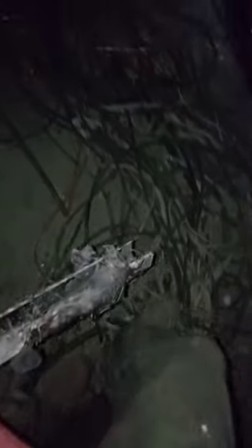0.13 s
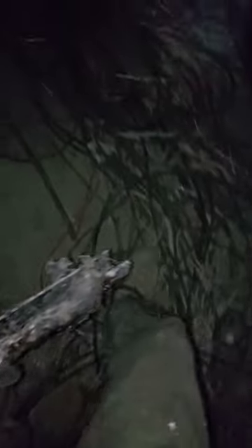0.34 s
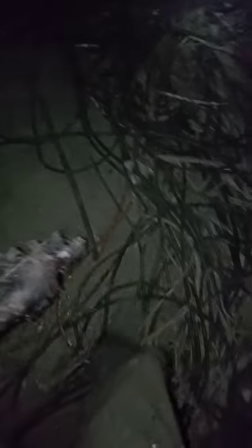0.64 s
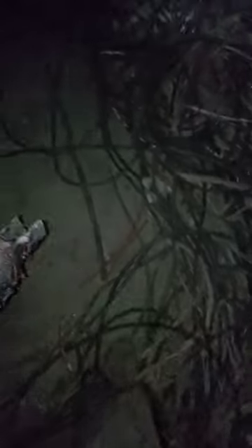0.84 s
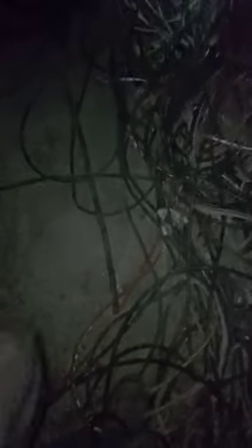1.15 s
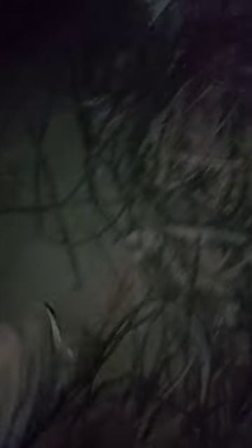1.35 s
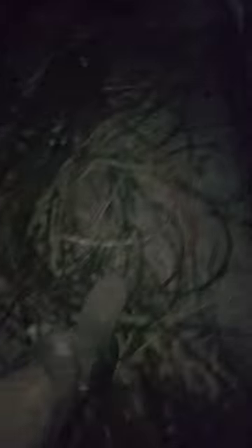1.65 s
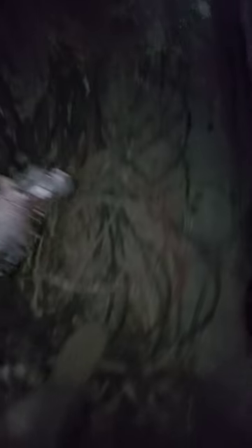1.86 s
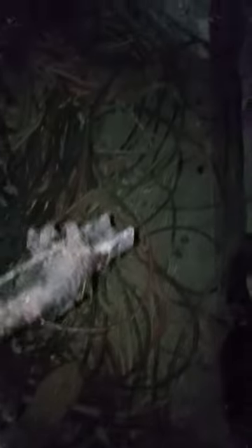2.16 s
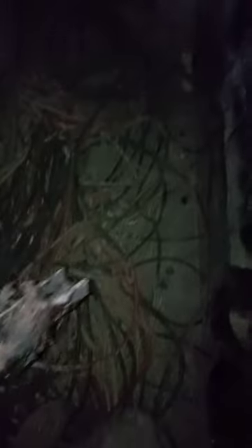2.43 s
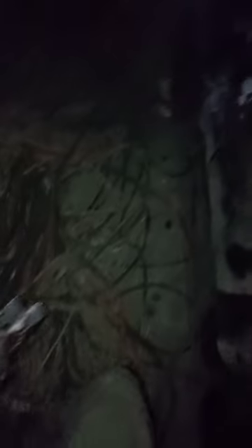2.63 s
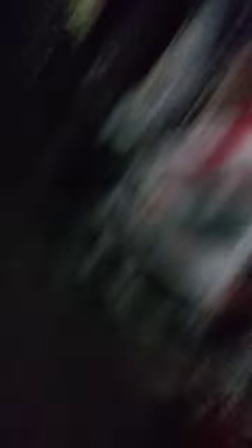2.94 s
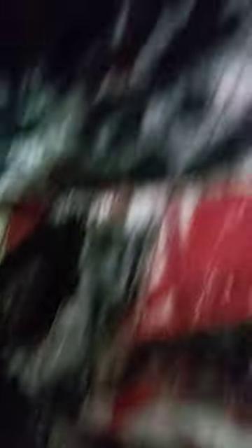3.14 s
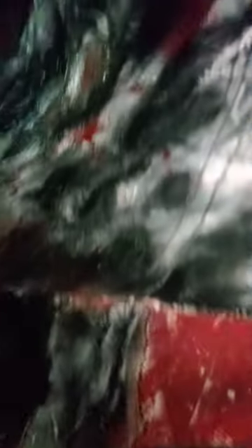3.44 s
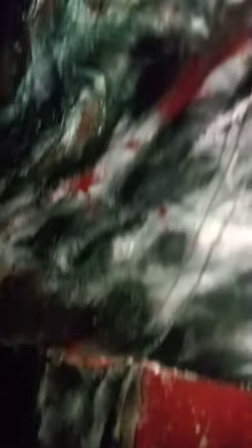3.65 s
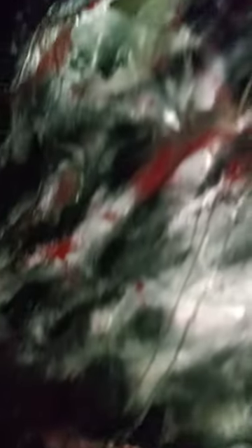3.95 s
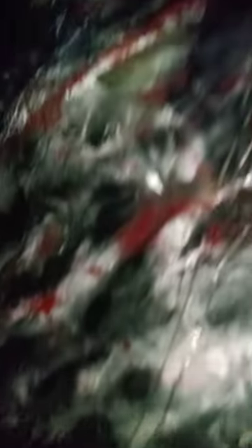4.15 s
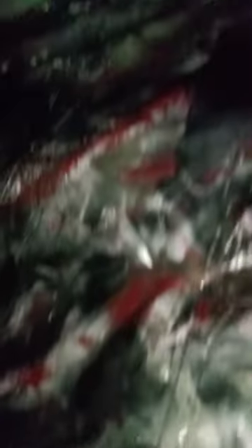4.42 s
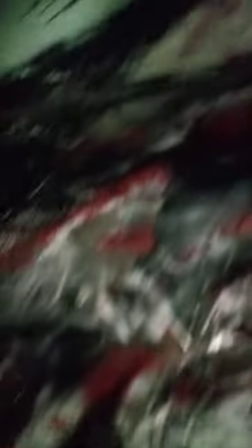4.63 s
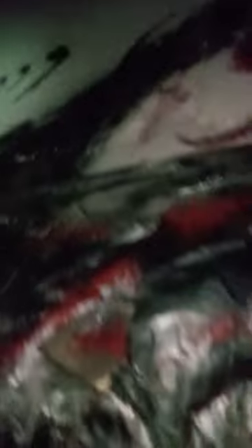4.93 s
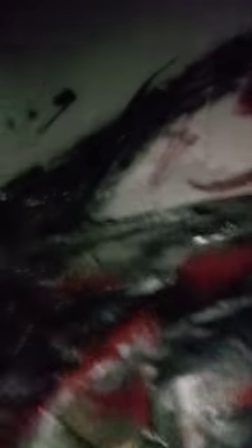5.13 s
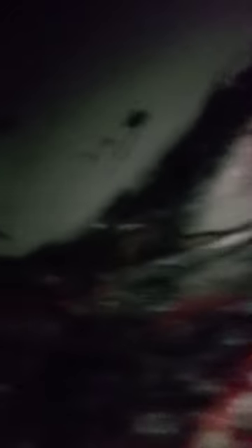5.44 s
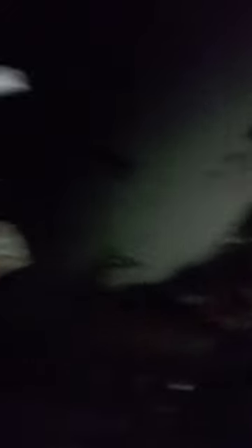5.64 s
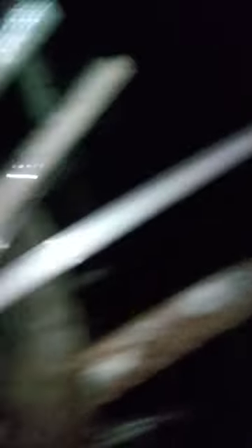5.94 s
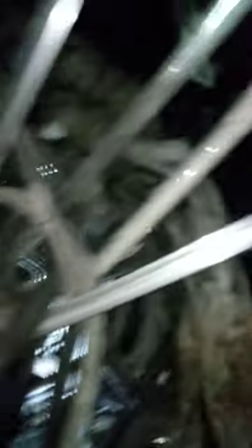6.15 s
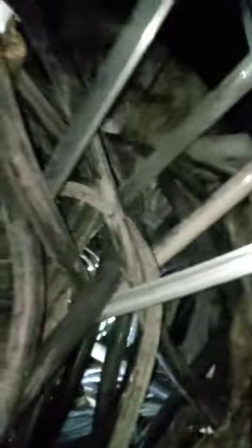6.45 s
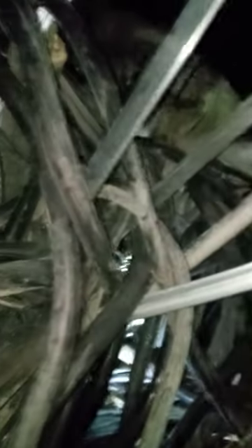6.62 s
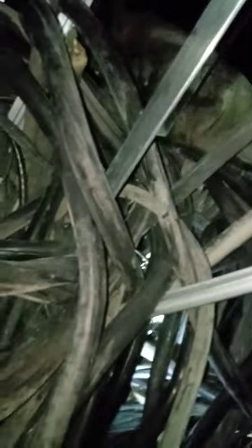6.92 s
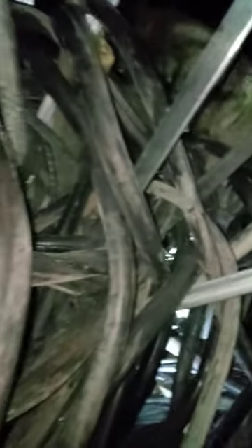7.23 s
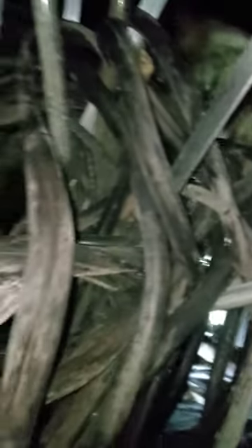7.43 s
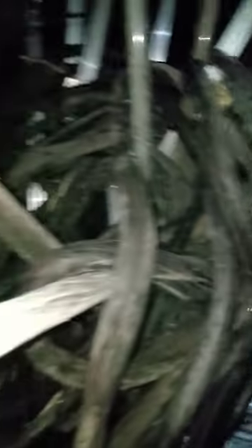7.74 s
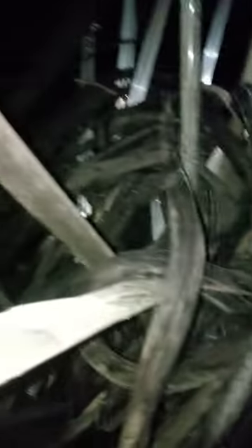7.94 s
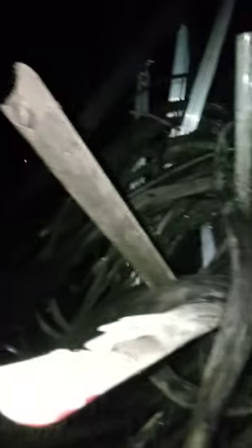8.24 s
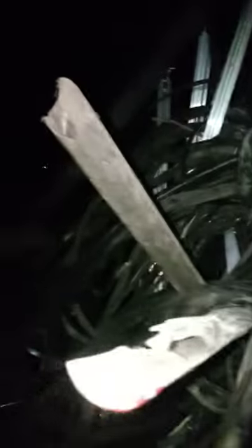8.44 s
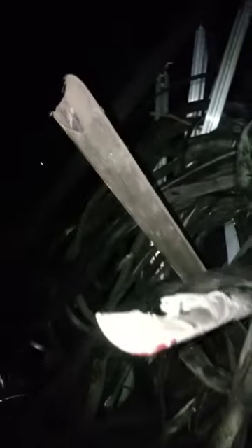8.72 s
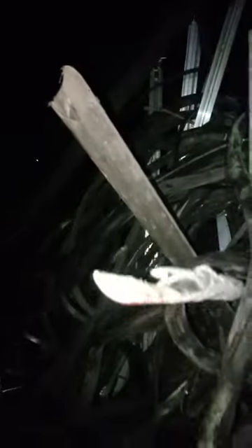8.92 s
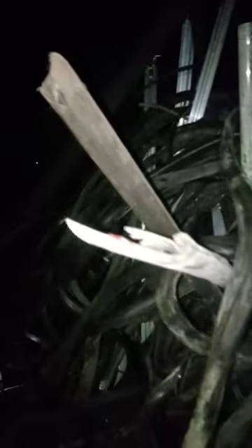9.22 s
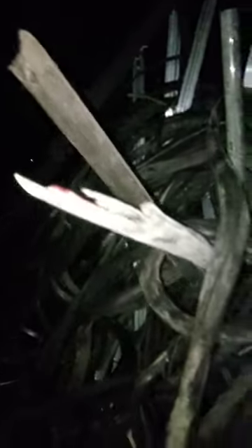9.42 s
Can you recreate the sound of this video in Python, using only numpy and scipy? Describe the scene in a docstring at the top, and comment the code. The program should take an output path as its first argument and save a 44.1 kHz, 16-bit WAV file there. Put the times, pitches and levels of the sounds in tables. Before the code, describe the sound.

Someone pushes through dry grass and dead stalks at night, with shoe scuffs, sharp snaps, and one thick hollow stalk breaking loudly.

```python
"""Walking through dry stalks

Someone pushes through dry grass and dead stalks at night, beside a hard wall.
Stalks crackle and snap, and one thick hollow stalk breaks: bursts of tiny fractures, filtered to ring.
Shoes scuff and thud in the same way; blades swish and rustle as grains of noise that swell and fade.
A long dull echo, made from the sound's stored energy, lies over a low outdoor rumble of filtered noise."""
import sys
import numpy as np
from scipy import signal
from scipy.fft import rfft, irfft, next_fast_len
from scipy.io import wavfile
from scipy.ndimage import uniform_filter1d, map_coordinates

SR = 44100
rng = np.random.default_rng(int(sys.argv[2]) if len(sys.argv) > 2 else 0)


def wav_out(sig):
    """Save sig, one row per channel (or a flat mono array), as 16-bit PCM at SR to the path in sys.argv[1]."""
    wavfile.write(sys.argv[1], SR, np.round(np.clip(np.atleast_2d(sig).T, -1, 1) * 32767).astype(np.int16))


N = 422478  # length of the scene in samples
HIT = np.arange(8192) / SR  # time axis of one short hit, in seconds
HIT_HZ = np.fft.rfftfreq(len(HIT), 1 / SR)

# Thin stalks snapping, from loud cracks to faint ticks that stand out in quiet moments.
# Each row: start in seconds, level in dB, ring in Hz, body in dB against the ring,
# splinters in dB against the ring (both before a small trim), tearing time in seconds.
THIN_SNAPS = [(0.0689, -36, 2030, -0.5, -18, 0.0094), (0.077, -35.5, 1700, -15, -15.5, 0.021),
              (0.765, -46.5, 1900, -18, -24, 0.048), (0.783, -38, 3950, -9, -24, 0.016),
              (1.2234, -57, 3400, -15, -7, .0074), (1.258, -33, 1770, -10.5, -31, 0.047),
              (1.6256, -38, 1740, -6, -13.5, 0.036), (1.6376, -33, 1740, -9, -17, 0.11),
              (1.693, -31.5, 1800, -26, -15, 0.037), (1.7058, -24, 1660, -25, -21, 0.0056),
              (1.7194, -23.5, 1950, -15, -16, 0.034), (1.7863, -37.5, 2350, -19, -3, 0.0095),
              (2.014, -27.5, 1380, -27, -43, 0.028), (2.118, -19, 2600, -13.5, -18.5, 0.0036),
              (2.125, -30.5, 1650, -17, -38, 0.028), (2.1456, -35.5, 2920, -22, -18, 0.0058),
              (2.576, -34, 3440, -9, -3, 0.029), (2.804, -44.5, 2420, -2.5, -6.5, 0.076),
              (3.0344, -38, 1760, -12, -14, .11), (3.1074, -45.5, 3160, -12, -7, 0.02),
              (3.1422, -47.5, 3120, -13, -25, 0.012), (3.2767, -45, 1520, -18, -34, 0.031),
              (3.452, -30, 2190, -24, -27, 0.039), (3.996, -48.5, 3000, 2, -11, 0.025),
              (4.007, -36.5, 2330, -5, -13, 0.071), (4.201, -62, 2490, -7, 9, .01),
              (4.232, -49.5, 2900, -7, -19, .041), (4.3118, -44.5, 2800, -7, -1.5, .022),
              (4.4334, -60, 2280, -6, 5, .036), (4.478, -59.5, 2780, -4, 0, 0.15),
              (4.5056, -52.5, 2780, -6, -5, 0.013), (4.531, -52.5, 2770, -4, 4, .027),
              (4.6379, -45.5, 2600, -13, -12, 0.018), (4.6727, -46.5, 2800, -11, -12, 0.023),
              (4.701, -46, 2600, -5, -11, 0.028), (4.7747, -19.5, 1890, -8.5, -18.5, 0.023),
              (4.8488, -41, 1280, -6, -12.5, .065), (4.9343, -49, 1740, -3, -10, .093),
              (5.018, -40.5, 3160, -15, -11, 0.016), (5.13, -34.5, 3100, -5, -12, 0.034),
              (5.1624, -32, 3100, -22, -16, 0.014), (5.52, -42, 1450, 2, -16, 0.092),
              (5.6233, -44.5, 1700, -3, -13, 0.1), (6.088, -39, 1260, -15, -1.5, 0.032),
              (6.1446, -40.5, 1300, -1, -4, 0.079), (6.3016, -41, 1340, -6, -21, 0.051),
              (6.485, -49.5, 1290, -2, -11, .031), (6.619, -55.5, 1540, 4, -7, 0.049),
              (7.0788, -54.5, 2680, -7, -6, 0.036), (7.1178, -53.5, 1320, -7, -5, .031),
              (7.2194, -46.5, 4270, -12, -5, 0.037), (7.237, -43, 2640, -13, -15, 0.032),
              (7.2477, -42, 3300, -10, -9, 0.035), (7.2933, -41, 2740, -21, -10, .019),
              (7.346, -53, 2490, -1, -4, 0.028), (7.6578, -45, 2200, -7, -6, 0.15),
              (7.7276, -56, 2550, -18, -4, 0.033), (7.813, -55, 3140, -4, -10, .016),
              (7.9885, -59, 1600, -7, 3.5, 0.046), (8.018, -48, 1770, -5, -5.5, 0.024),
              (8.106, -47.5, 3400, -13, -10.5, 0.028), (8.1478, -47, 2680, -9, -7, .13),
              (8.3114, -61.5, 2960, -3, 2, 0.052), (8.339, -57, 4200, -12, -8, .022),
              (8.385, -49, 2900, -4, -8, 0.1), (8.48, -53, 3250, -14, -12, .029),
              (8.525, -52, 2940, -6, -19, 0.021), (8.569, -44, 4660, -21, -10, 0.027),
              (8.609, -48, 3080, -9.5, -8, 0.033), (8.8067, -55.5, 3280, -10.5, -6.5, 0.034),
              (8.914, -47, 2000, -8, -17.5, 0.036), (9.065, -62, 2560, -9, -2.5, .039)]
# Tone of a thin stalk's woody body. Each row: frequency in Hz, relative level in dB.
BODY_TONE = [(100, -35.5), (380, -15), (620, 1.5), (950, 1.5), (1400, -4.5), (3000, -52), (9000, -86)]


def snaps():
    """Each thin stalk rings briefly at its own pitch, with a woody body and bright splinters."""
    out = np.zeros(N)
    for s, db, hz, body_db, splinter_db, t60 in THIN_SNAPS:
        run = tear(t60, first=1.47)
        ring = amp(-0.72) * stalk(run, hz)
        body = amp(body_db + 0.5) * blow(colour(run, BODY_TONE))
        splinters = amp(splinter_db + 1.2) * splinter(run)
        add(out, s, amp(db) * (ring + body + splinters))
    return out


# Broad tone of a dry stalk, before its rings. Each row: frequency in Hz, relative level in dB.
STALK_TONE = [(400, -13.5), (1000, -3), (1600, 3.5), (3100, 8), (4200, 1), (5500, -12.5), (9000, -49),
              (16000, -55)]


def stalk(run, hz):
    """A thin stalk's answer: a main ring, fading to both sides, and weaker rings that differ each time."""
    other_hz = hz * 2 ** rng.uniform(-.8, 1, 4)
    others = [(ring_hz, .12 * hz, 5) for ring_hz in other_hz]
    main = [(hz, 0.23 * hz, 9), (hz, 2.0 * hz, 10)]
    soft_top = (3.1 * hz, 2.1 * hz, -7)  # thicker stalks are duller
    return blow(colour(run, STALK_TONE, main + [soft_top] + others))


# Bright tone of splintering fibres. Each row: frequency in Hz, relative level in dB.
SPLINTER_TONE = [(1500, -17), (3500, 8), (5200, -1), (6300, -3), (7300, 3), (8600, -7.5), (10500, -13.5),
                 (12500, -14), (14200, -4), (16000, -14.5)]


def splinter(run):
    """The bright part of a fracture, with gentle chance resonances spread over the treble."""
    centres = np.linspace(4500, 14500, 6) + rng.uniform(-800, 800, 6)
    return blow(colour(run, SPLINTER_TONE, [(hz, 600, 5) for hz in centres]))


# The thick hollow stalk giving way. Each row: start in seconds, level in dB, thud in dB against
# the wood, splinters in dB against the wood (both before a trim), tearing time in seconds.
THICK_BREAKS = [(5.717, -40.5, -24.5, -20.5, 0.028), (5.878, -31.5, -13, -10.5, 0.085),
                (5.926, -38, -18, -16, 0.051), (5.966, -18.5, -15, -12, 0.022),
                (5.972, -11, -15, -33, 0.026), (6.015, -20.5, -40.5, -16.5, 0.042),
                (6.024, -21.5, -25, -20, 0.054), (6.039, -23.5, -7.5, -22, 0.049),
                (6.051, -32.5, -1, -40, 0.054)]
# Resonances of the hollow tube. Each row: frequency in Hz, width in Hz, strength in dB
# (widths and strengths are rescaled below).
TUBE_RINGS = [(614, 15.3, 8.5), (751, 32, 6), (1010, 40, -3.5), (1208, 10, -3), (1894, 18, -11),
              (1970, 76, -30), (2410, 17, -8.5), (2820, 43, -14), (3350, 55, -26), (7200, 180, -42.5)]
# Broad tone of the thick wood. Each row: frequency in Hz, relative level in dB.
WOOD_TONE = [(150, -58), (300, -11), (420, -12), (600, -7.5), (1100, -1.5), (1600, -11), (2600, -14.5),
             (4500, -24.5), (9000, -62.5), (16000, -63.5)]
# Tone of a jolt to the ground. Each row: frequency in Hz, relative level in dB.
THUD_TONE = [(20, -39), (50, -11), (100, 3), (170, 0.5), (260, -8.5), (420, -6.5), (1000, -52.5),
             (5000, -86.5)]


def breaks():
    """The thick stalk tears in stages, each ringing the same hollow tube and jolting the ground."""
    out = np.zeros(N)
    # broad rings of more even strength
    tube = [(hz, 2.3 * width, 8.5 + .25 * db) for hz, width, db in TUBE_RINGS]
    for s, db, thud_db, splinter_db, t60 in THICK_BREAKS:
        wood = amp(-1.0) * blow(colour(tear(t60, first=1.0), WOOD_TONE, tube))
        thud = amp(thud_db - 6.0) * blow(colour(tear(t60, first=0.49), THUD_TONE))
        crack = tear(0.58 * t60, first=0.56)  # the hard skin splits faster than the pith
        skin = amp(splinter_db + 5.5) * blow(colour(crack, STALK_TONE))
        bright = blow(colour(crack, SPLINTER_TONE, [(7140, 400, 7.1)]))
        splinters = amp(splinter_db + 2.0) * bright
        add(out, s, amp(db) * (wood + thud + skin + splinters))
    return out


# Shoes landing and scuffing. Each row: start in seconds, level in dB, knock in Hz, thud in dB
# against the knock, grit in dB against the knock (both before a trim), sounding time in seconds.
SHOE_STEPS = [(0.184, -30, 500, -35, -24, 0.078), (0.194, -28, 497, -30, -28, .1),
              (0.92, -32, 228, -11, -9, .047), (0.972, -32, 308, 7, 11, 0.12),
              (0.997, -25, 880, 3, -5, 0.062), (1.017, -24.5, 279, -5, -9, 0.039),
              (1.087, -29, 240, 0, -10.5, 0.12), (1.195, -32.5, 345, 4, -14, 0.069),
              (1.207, -26.5, 333, -15, -11.5, 0.012), (1.303, -27.5, 200, 6.5, -3, 0.031),
              (1.308, -15, 310, 4, -11, 0.0047), (1.316, -20, 860, -25, -3, 0.038),
              (1.325, -26.5, 222, 3, -1, 0.06)]
# Tone of crushed grit and straw. Each row: frequency in Hz, relative level in dB.
GRIT_TONE = [(300, -19), (900, 5.5), (1900, 13.5), (3200, 12), (5200, -2.5), (7300, -2.5), (10500, -22),
             (14500, -10)]


def steps():
    """A sole pushes on the ground, knocks, and crushes grit and straw."""
    out = np.zeros(N)
    for s, db, hz, thud_db, grit_db, t60 in SHOE_STEPS:
        push = tear(t60, first=4.6)
        knock_tone = [(hz / 4, -20), (hz, 0), (2.22 * hz, -10), (7 * hz, -38), (25 * hz, -75)]
        knock = amp(2.0) * blow(colour(push, knock_tone))
        thud = amp(thud_db - 7.5) * blow(colour(push, THUD_TONE))
        grit = amp(grit_db - 2.5) * blow(colour(tear(0.81 * t60, first=1.9), GRIT_TONE))
        add(out, s, amp(db) * (knock + thud + grit))
    return out


# Blades sweeping past a leg. Each row: peak in seconds, level in dB, seconds to rise by 60 dB,
# seconds to fall by 60 dB, ring in Hz, ring strength in dB.
BLADE_SWISHES = [(0.201, -36, 0.29, 0.31, 1935, 23), (0.68, -54.5, 0.19, 0.6, 11100, 25),
                 (0.893, -37.5, 0.066, .2, 1900, 15), (0.965, -25, 0.25, 0.13, 2880, -3),
                 (1.003, -20, 0.11, 0.071, 900, 0.5), (1.727, -34, 0.27, .45, 2200, 4),
                 (2.105, -35.5, .05, 0.18, 2580, 4.5), (2.43, -53, 0.41, .3, 2740, 13),
                 (3.448, -46, 0.13, 0.088, 2310, 31), (3.59, -48, .3, .27, 1480, 19),
                 (3.801, -45, .17, 0.14, 3480, -1), (4.019, -49.5, .054, 0.84, 2000, 8),
                 (5.87, -45.5, 0.69, 1, 3600, 12)]
# Broad tone of sliding blades. Each row: frequency in Hz, relative level in dB.
BLADE_TONE = [(30, -34), (120, -1), (900, 2), (1400, -3), (2800, -4), (4000, -11), (5300, -19), (7300, -14),
              (10500, -35), (12500, -35), (14500, -28), (16000, -36)]


def swishes():
    """Blades brush along the leg, swelling and fading; each tuft has its own pitch."""
    out = np.zeros(N)
    t = np.arange(-SR // 5, 2 * SR // 5) / SR  # seconds around the peak
    stutter = amp(2.8 * wobble(350))
    for s, db, rise, fall, hz, ring_db in BLADE_SWISHES:
        force = amp(db - 60 * np.maximum(-t / rise, t / fall))
        grains = fibres(len(t), rate=11000, spread_db=4.0)
        grains = grains * stutter[round(s * SR):][:len(t)]
        add(out, s + t[0], force * unit(colour(grains, BLADE_TONE, [(hz, 1.4 * hz, ring_db)])))
    return out


# Pushes through the grass. Each row: peak in seconds, rustle in dB, crackle in dB (both before
# a trim), seconds to rise by 60 dB, seconds to fall by 60 dB.
GRASS_PUSHES = [(0.05, -51, -64, .8, 1.5), (0.331, -48, -70.5, 1.2, 1.4), (1.13, -46, -69, 1, 1.2),
                (1.41, -44.5, -65, 0.62, 1.1), (1.981, -51, -63.5, .7, .6), (2.6, -57, -65, .4, .9),
                (3.101, -51, -68, .7, 1.1), (4.22, -53.5, -71, .5, .6), (4.501, -54, -68.5, 0.54, .5),
                (4.7, -55, -64, .5, .7), (4.95, -47.5, -66.5, 0.83, 2.5), (5.399, -50, -72, 0.56, .7),
                (5.85, -57, -55, .7, 1), (6.5, -59.5, -80.5, .8, .8), (7.261, -55, -60, .4, .8),
                (7.732, -55, -74, .3, .9), (8.36, -69, -77, .5, .6), (8.63, -66, -75.5, .5, .7),
                (9.02, -66, -82.5, .5, .6)]
# Light contact with the grass, dying down as the walker comes to rest.
# Each row: time in seconds, rustle in dB before a trim.
LIGHT_CONTACT = [(0, -57), (0.65, -62), (1.8, -55), (2.4, -58.5), (3.4, -57), (4.4, -63), (5.5, -57),
                 (6.9, -65.5), (8.5, -64), (9.58, -70)]
CONTACT_CRACKLE_DB = -23.5  # crackle gain of light contact against its rustle gain


def pressure():
    """Gains of the rustle and the crackle: every push swells and fades on top of the light contact."""
    rustle = amp(curves(LIGHT_CONTACT)[0]) ** 2
    crackle = rustle * amp(CONTACT_CRACKLE_DB) ** 2
    for s, rustle_db, crackle_db, rise, fall in GRASS_PUSHES:
        power = swell(s, rise, fall) ** 2
        rustle = rustle + amp(rustle_db) ** 2 * power
        crackle = crackle + amp(crackle_db) ** 2 * power
    return np.sqrt(rustle), np.sqrt(crackle)


TICK_DB, TICK_SPREAD_DB = -66.5, 9  # a weak tick under average brushing; the strongest above the weakest
TICK_FOLLOWS, TICK_CROWDING = .5, .35  # power of the crackle that sets the ticks' size, and their rate


def ticks(crackle_gain):
    """Bent blades give many small snaps, louder and closer together the harder they are brushed."""
    out = np.zeros(N)
    force = crackle_gain / np.exp(np.mean(np.log(crackle_gain)))  # 1 at average brushing
    due = np.cumsum(force ** TICK_CROWDING)
    draws = rng.random((220, 5))  # one row per tick
    for k, (when, size, pitch, bright, life) in enumerate(draws):
        at = min(np.searchsorted(due, due[-1] * (k + when) / len(draws)), N - 1)
        run = tear(.008 + .03 * life, first=1.5)
        tick = stalk(run, 2100 * 2 ** pitch) + amp(-11 + 12 * bright) * splinter(run)
        gain = amp(TICK_DB + TICK_SPREAD_DB * size ** 2) * force[at] ** TICK_FOLLOWS
        add(out, at / SR, gain * tick)
    return out


# Tone of rubbing dry blades. Each row: frequency in Hz, relative level in dB.
RUSTLE_TONE = [(400, -15), (1000, 1.5), (1800, 3), (3000, -1), (4200, -9.5), (5500, -26.5), (7300, -17),
               (10000, -40), (16000, -49.5)]
# Tone of litter under the soles. Each row: frequency in Hz, relative level in dB.
LITTER_TONE = [(150, -22.5), (450, -2), (900, -9.5), (1500, -12.5), (3000, -15), (9000, -62.5)]
# Soles dragging through the litter. Each row: peak in seconds, level in dB before a trim,
# seconds to rise by 60 dB, seconds to fall by 60 dB.
SOLE_DRAGS = [(0.02, -38.5, 0.66, 2.6), (0.27, -45, 0.75, 0.84), (0.8, -44, 0.22, 1.2),
              (1.22, -51, 0.74, 1.1), (2.079, -45, 0.54, 0.5), (2.6, -50.5, .8, 1.3)]


def brushing(rustle_gain, crackle_gain):
    """Dry blades rub and crackle in small clumps; soles drag through the litter."""
    clumps = amp(2.2 * wobble(45) + 3.5 * wobble(200))
    grains = fibres(N, rate=2600, spread_db=2.5) * clumps
    crackle = crackle_gain * amp(5.5) * unit(colour(grains, SPLINTER_TONE))
    rubbing = hiss(RUSTLE_TONE) + 1.03 * unit(colour(grains, RUSTLE_TONE))
    rustle = rustle_gain * amp(-5.0) * rubbing
    drag = sum(amp(db - 3.0) * swell(s, rise, fall) for s, db, rise, fall in SOLE_DRAGS)
    return crackle + rustle + drag * hiss(LITTER_TONE)


# How much sound is sent into the echo; sounds close by are drier.
# Each row: time in seconds, send level in dB.
ECHO_SEND = [(0, -18), (1.0, -66), (1.7, -8), (2.15, -29.5), (3.4, -10), (4.8, -6.5), (6.0, -11.5),
             (9.5, -4.5)]
# How long the slow part of the echo lasts. Each row: frequency in Hz, seconds to fall by 60 dB.
WALL_DECAY = [(100, 1.5), (400, 18), (800, 5.9), (2000, 2.46), (3500, 2.2), (6000, 1.1), (12000, .3)]


def walls(x):
    """A diffuse echo: each band stores the sound's energy and lets it go, quickly nearby and slowly far off."""
    hz, t, z = signal.stft(x * amp(curves(ECHO_SEND)[0]), SR, nperseg=256)
    energy = uniform_filter1d(np.abs(z) ** 2, size=5, axis=0)
    energy = uniform_filter1d(energy, size=3, axis=0)
    keep = amp(-120 * t[1] / along(WALL_DECAY, hz))  # share of the energy left after one step

    def store(shares):
        """Fill each band's energy store and let it leak."""
        bands = zip(shares, energy)
        return np.array([signal.lfilter([0, 1 - k], [1, -k], band) for k, band in bands])

    stored = 0.22 * store(keep) + 0.37 * store(keep ** 3)  # slow part, then one three times as fast
    tone_db = [(100, -15.5), (400, -0.5), (800, 3.5), (1300, -0.5),
               (2000, -1.5), (3200, -2), (5000, 0.5), (12000, -4.5)]
    tone = amp(along(tone_db, hz))[:, None]
    scatter = signal.stft(rng.standard_normal(N), nperseg=256)[2]
    echo = scatter / np.std(scatter) * tone * np.sqrt(np.abs(stored))
    return signal.istft(echo, nperseg=256)[1][:N]


# Loudness of the rumble over time. Each row: time in seconds, level in dB before a trim.
RUMBLE_LEVEL = [(0.0, -45.5), (0.21, -42), (0.64, -50), (1.17, -47), (1.41, -48), (2.94, -46.5),
                (3.66, -50), (6.86, -52), (9.58, -55.5)]
# Tone of the rumble. Each row: frequency in Hz, relative level in dB.
OUTDOOR_TONE = [(20, -31), (40, -11), (80, -1), (140, 1), (300, 1.5), (480, -6), (750, -13.5), (1200, -33),
                (3000, -27), (6000, -46.5), (15000, -54)]


def outdoors():
    """A low, lumpy rumble whose bands waver on their own."""
    level_db, = curves(RUMBLE_LEVEL)
    z = signal.stft(hiss(OUTDOOR_TONE), nperseg=4096)[2]
    patches = uniform_filter1d(rng.standard_normal(z.shape), 4, axis=0)
    patches = unit(uniform_filter1d(patches, 3, axis=1))
    rumble = signal.istft(z * amp(2.55 * patches), nperseg=4096)[1][:N]
    return amp(level_db + 2.0) * unit(rumble)


def fibres(count, rate, spread_db):
    """Tiny fractures of uneven size at random moments, rate a second."""
    breaking = rng.random(count) < rate / SR
    sign = rng.choice([-1, 1], count)
    return breaking * sign * amp(spread_db * rng.standard_normal(count))


def tear(t60, first):
    """One fracture, then a run of fibres that swells and dies; a slower tear has a weaker first fracture."""
    age = HIT / max(t60, .004)
    run = fibres(len(HIT), rate=9000, spread_db=0.5) * amp(-60 * age) * (1 - np.exp(-age / 0.06))
    run /= np.linalg.norm(run) + 1e-12
    run[0] += first * np.exp(-max(t60, 0) / 0.033)
    return run


def swell(s, rise, fall):
    """Gain over the whole scene: up 60 dB in rise seconds to a peak at s, down 60 dB in fall seconds."""
    t = np.arange(N) / SR - s
    return amp(-60 * np.minimum(np.maximum(-t / rise, t / fall), 2))  # never below -120 dB


def wobble(rate):
    """A smooth random curve, rate knots a second."""
    knots = rng.standard_normal(int(N * rate / SR) + 4)
    return map_coordinates(knots, [np.arange(N) * rate / SR])


def hiss(spectrum):
    """Coloured noise of rms 1."""
    return unit(filtered(rng.standard_normal(N), lambda hz: amp(along(spectrum, hz))))


def colour(x, spectrum, rings=()):
    """Filter that never sounds early: a broad spectrum raised by resonances (Hz, width in Hz, dB)."""
    gain_db = along(spectrum, HIT_HZ)
    gain_db = gain_db + sum(db / (1 + (2 * (HIT_HZ - hz) / width) ** 2) for hz, width, db in rings)
    # folding the cepstrum packs the response right after its start (minimum phase)
    cepstrum = irfft(gain_db * np.log(10) / 20)
    fold = 1 + np.sign(len(HIT) // 2 - np.arange(len(HIT)))
    fold[0] = 1
    response = irfft(np.exp(rfft(cepstrum * fold)))
    return signal.fftconvolve(x, response)[:len(x)]


def filtered(x, response):
    """x times a response of frequency."""
    m = next_fast_len(N + SR // 2)
    return irfft(rfft(x, m) * response(np.fft.rfftfreq(m, 1 / SR)), m)[:N]


def along(points, hz):
    """Read (Hz, value) points on a log frequency axis."""
    f, v = np.transpose(points)
    return np.interp(np.log(hz + 1), np.log(f + 1), v)


def curves(rows):
    """One value per sample for each column after the time."""
    s, *cols = np.transpose(rows)
    return [np.interp(np.arange(N) / SR, s, c) for c in cols]


def add(track, s, sound):
    """Mix a sound in at s seconds."""
    start = max(round(s * SR), 0)
    track[start:start + len(sound)] += sound[:N - start]


def blow(x):
    """Scale to the energy of 10 ms at rms 1."""
    return x * np.sqrt(SR / 100) / (np.linalg.norm(x) + 1e-12)


def unit(x):
    """Scale to rms 1."""
    return x / np.sqrt(np.mean(x ** 2) + 1e-20)


def amp(db):
    """Decibels to gain."""
    return 10 ** (np.asarray(db) / 20)


def scene():
    """The stalks and steps, their echo, the brushed grass and the night around them."""
    rustle_gain, crackle_gain = pressure()
    near = snaps() + breaks() + steps() + swishes()
    grass = ticks(crackle_gain) + brushing(rustle_gain, crackle_gain)
    return (near + walls(near) + grass + outdoors())[None]


TOP_HZ = 15600  # upper band limit


def record(dry):
    """A soft limit rounds off the tallest peaks, and a steep filter cuts what lies above the band limit."""
    rounded = dry[0] / (1 + (dry[0] / .85) ** 4) ** .25
    return filtered(rounded, lambda hz: 1 / (1 + (hz / TOP_HZ) ** 120))[None]


dry = scene()
out = record(dry)
wav_out(out)
```